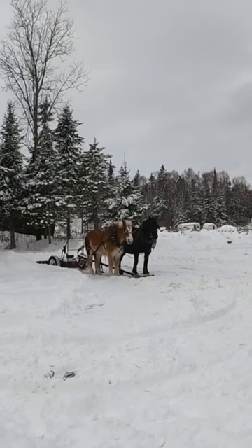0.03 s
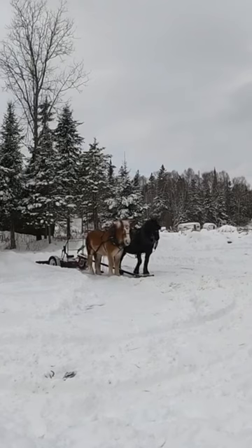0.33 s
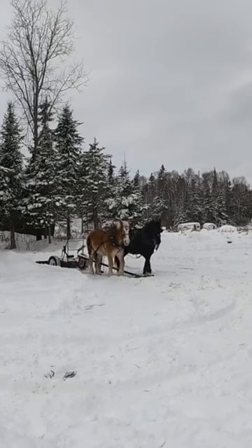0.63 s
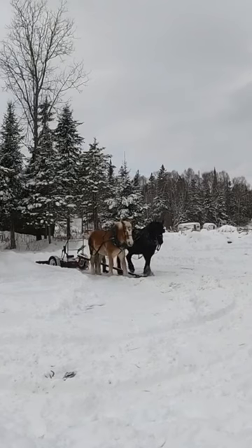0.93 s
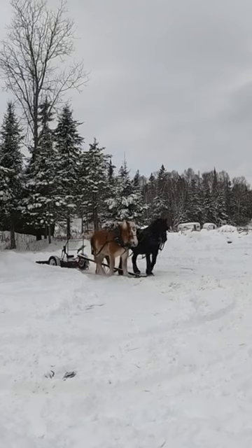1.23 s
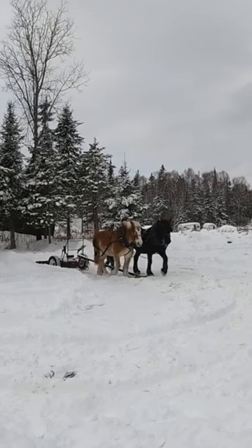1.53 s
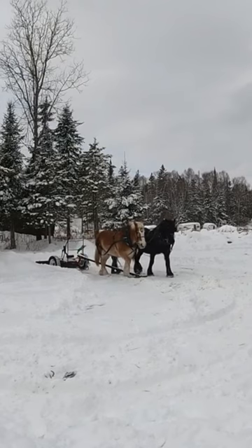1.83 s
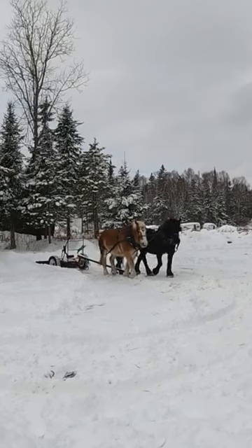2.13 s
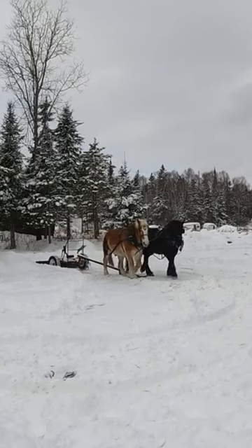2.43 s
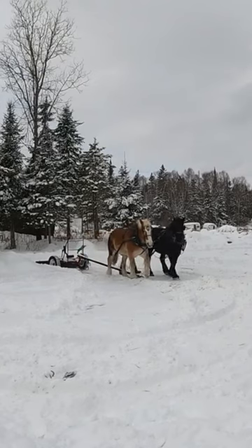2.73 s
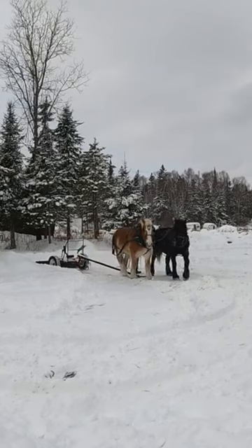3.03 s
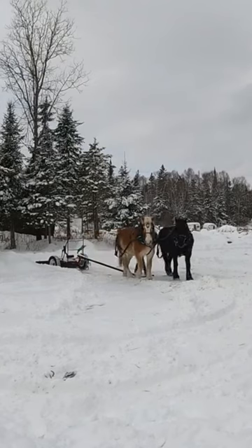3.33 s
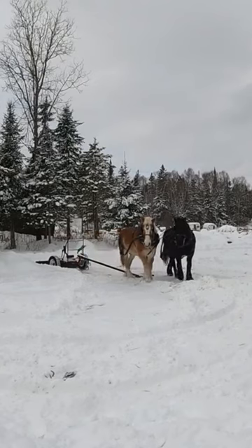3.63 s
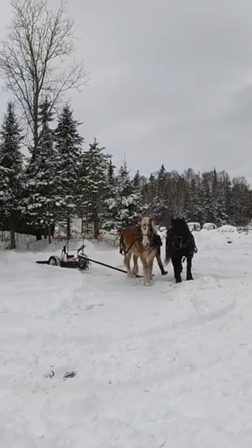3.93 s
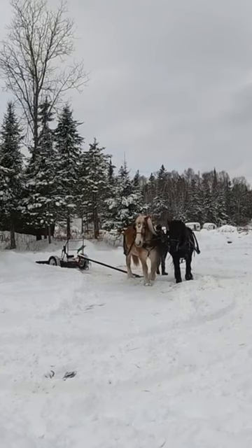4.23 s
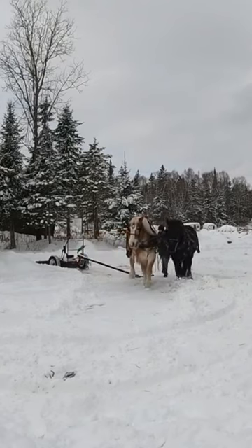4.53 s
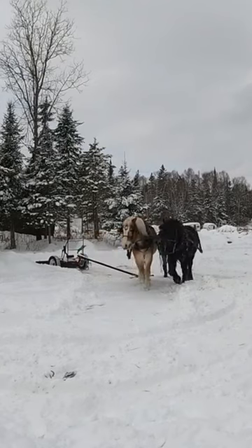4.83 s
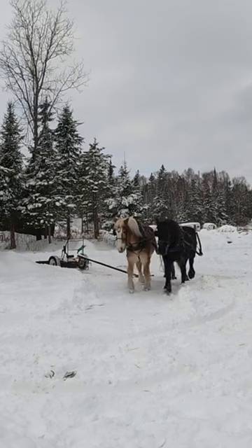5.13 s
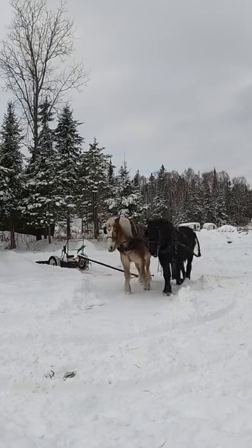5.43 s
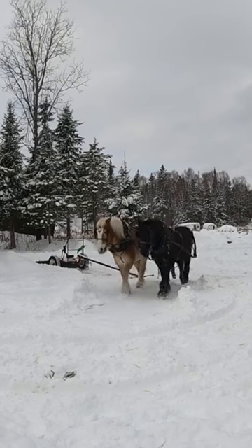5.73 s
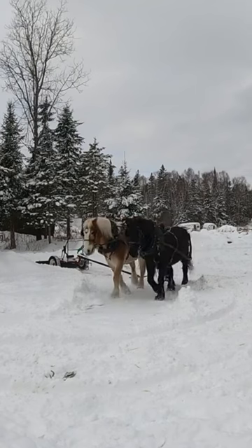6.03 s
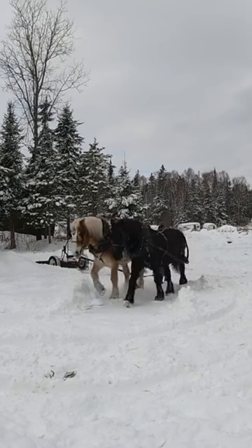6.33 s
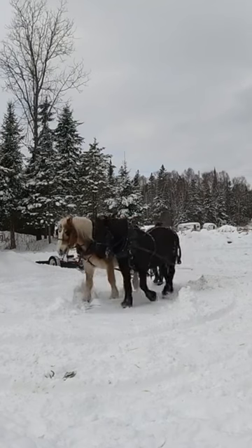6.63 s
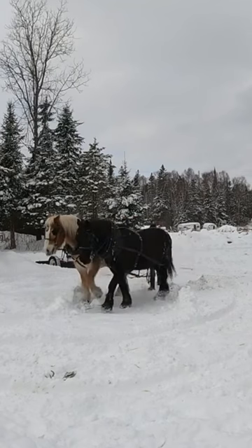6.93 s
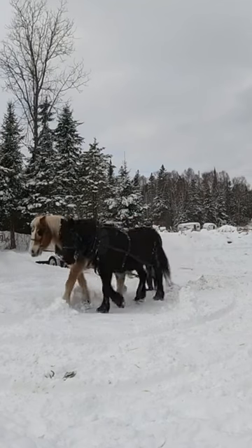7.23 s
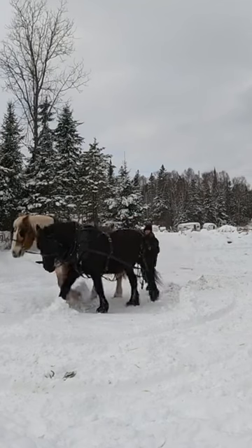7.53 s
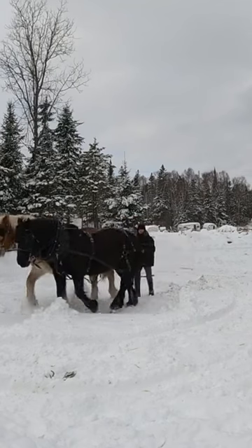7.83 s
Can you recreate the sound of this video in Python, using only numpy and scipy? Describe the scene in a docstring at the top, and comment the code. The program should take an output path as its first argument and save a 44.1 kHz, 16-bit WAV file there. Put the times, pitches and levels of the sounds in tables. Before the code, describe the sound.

Light wind rumbles on the microphone throughout, over the faint hush of an open field and a thin, far-off machine whine that fades in and out. From about 0.4 seconds two draft horses move through the snow: harness chains clink and rattle in irregular, bright bursts, and the crust crunches and creaks. A wooden pole knocks at about 1, 1.6 and 2.7 seconds, and occasionally afterwards. Dull, uneven hoof thuds begin at 1.6 seconds and grow heavier as the team approaches. From 3.7 seconds a steel ring gives a few short, high pings, the strongest just after 6 seconds and at 6.4. Low gusts swell near 3.3 and 5.3 seconds, with a brief sharp buffet at 7.4. The crunching tread peaks around 6.6 seconds and stays close, with chains jingling, until the end at 8 seconds. Everything is fairly quiet, with almost no echo.

```python
"""Light wind rumbles on the microphone and a thin far-off whine, like a machine's, fades in and out.
From 0.4 s two draft horses pull a cart across a snowy field towards the listener: harness chains
clink and rattle, snow crunches. From 1 s the wooden pole knocks, from 1.6 s hooves thud, and from
3.7 s a struck steel ring sings now and then. The tread is loudest near 6.6 s."""
import sys
import numpy as np
from scipy import signal
from scipy.io import wavfile
from scipy.ndimage import uniform_filter1d

SR = 44100
rng = np.random.default_rng(int(sys.argv[2]) if len(sys.argv) > 2 else 0)


def file_out(sig):
    """Save sig as 16-bit WAV at sys.argv[1]."""
    # one column per channel
    cols = np.atleast_2d(sig).T
    # limit, then scale
    lim = np.clip(cols, -1, 1)
    pcm = np.round(lim * 32767).astype(np.int16)
    wavfile.write(sys.argv[1], SR, pcm)


N = 355887
TIME = np.arange(N) / SR
TAIL = TIME[:SR // 6]

# Noise spectra. Each row: frequency in Hz, relative density in dB.
BREEZE_SPECTRUM = [(18, 6), (28, 2), (42, -3.5), (58, -1), (80, -17.5), (115, -18), (170, -19.5),
                   (280, -37)]
GUST_SPECTRUM = [(18, 4.5), (35, -1.5), (55, 0.5), (80, -16), (120, -23), (200, -33.5), (400, -47)]
FLAP_SPECTRUM = [(45, -16), (75, 4), (110, -7.5), (170, -10), (260, -38)]
AIR_SPECTRUM = [(60, 13.5), (200, 2), (450, 3.5), (850, 1), (1080, 10), (1400, 8.5), (1900, 1.5),
                (3000, -18.5), (7500, -18), (10000, -33.5)]
CRUST_SPECTRUM = [(1200, -6.5), (1750, 1.5), (2200, 3), (3000, -2), (4200, -3), (5400, -7), (7500, -6.5),
                  (9500, -14), (12500, -15), (15000, -37)]
PACK_SPECTRUM = [(100, 8.5), (170, 4.5), (300, 1.5), (600, -0.5), (850, -17.5), (1200, 0.5), (1700, -5.5),
                 (2600, -30)]
THUD_SPECTRUM = [(110, -4), (170, 0), (260, -3), (430, -7), (700, -14), (1200, -30)]
# Stereo image of the noises. Each row: frequency in Hz, left-right correlation.
CORRELATION = [(30, 1), (250, 0.83), (1000, 0.74), (2000, 0.48), (8000, 0.68), (12000, 1)]
# Level curves: wind between gusts, far tone, nearing tread. Each row: time in seconds, level in dB.
BREEZE_CURVE = [(0, -53), (1.5, -52), (4, -48.5), (6.1, -46.5), (8.05, -48.5)]
WHINE_CURVE = [(.06, -59), (.2, -70), (.3, -59.5), (.52, -55.5), (.72, -65), (1.35, -55.5), (1.5, -61.5),
               (1.6, -55.5), (1.92, -53.5), (1.99, -70), (2.13, -60.5), (2.42, -61), (3.1, -65.5),
               (3.17, -57), (3.3, -54), (3.4, -64.5), (3.65, -61), (4.05, -65), (4.2, -52.5), (4.38, -52.5),
               (4.44, -65), (4.75, -61), (4.85, -51), (5.15, -53.5), (5.22, -60.5), (5.52, -56),
               (5.62, -50.5), (5.96, -51), (6.03, -66), (6.15, -58.5), (6.78, -53), (7.05, -62), (7.2, -56),
               (7.4, -62.5), (7.9, -54), (7.97, -62)]
TREAD_CURVE = [(.38, -100), (.48, -81), (1.4, -74), (2.4, -74), (3.5, -70.5), (4.3, -72.5), (5.6, -68),
               (6.6, -64.5), (8.05, -66)]
# Gusts. Each row: peak time in seconds, level in dB, half-width in seconds.
WIND_GUSTS = [(0.106, -39.5, 0.055), (2.224, -42, 0.17), (3.298, -32.5, 0.069), (4.545, -46, 0.21),
              (4.73, -43.5, .03), (4.916, -47, 0.07), (5.313, -32.5, 0.069), (5.585, -41, 0.16),
              (5.895, -38, 0.077), (6.594, -45.5, 0.04), (7.373, -29.5, 0.022), (7.663, -43.5, 0.058)]
# Chain clinks. Each row: start in seconds, level in dB, tilt in dB per register, slack in seconds.
CHAIN_CLINKS = [(.433, -67.5, -5.5, 0.0024), (0.47, -64, 3.5, 0.031), (0.551, -60, 3, 0.01),
                (0.623, -64, -2.5, 0.016), (0.726, -69, -3, 0.011), (1.065, -56, 2.5, 0.011),
                (1.517, -64.5, 5, 0.0018), (1.578, -50, -2, 0.017), (1.68, -58.5, -6.5, 0.0056),
                (1.732, -49, -1.5, 0.0031), (1.892, -59.5, 3, 0.0096), (1.924, -56.5, 6, 0.019),
                (1.946, -55, -11, 0.011), (2.238, -56.5, -13, 0.011), (2.495, -61.5, -1, 0.0089),
                (2.559, -52.5, -7, 0.0095), (2.68, -51, -17, 0.015), (2.699, -47, -2, 0.0049),
                (2.725, -50.5, -9.5, 0.0096), (3.117, -59, -6, 0.0094), (3.167, -59.5, -12, 0.003),
                (3.228, -64, 0, .004), (3.243, -52, -8, 0.0058), (3.311, -53, -2, 0.0043),
                (3.377, -60, -1.5, 0.0073), (3.569, -60.5, -5.5, 0.0077), (3.606, -60, 9, 0.0096),
                (3.679, -58, 2.5, 0.017), (3.708, -57, 4, 0.0066), (3.794, -62, -2, 0.0074),
                (3.845, -44.5, -9.5, 0.0067), (4.051, -55, -5.5, 0.0028), (4.076, -56, -16, .028),
                (4.142, -61, 9, .005), (4.37, -60.5, -5.5, 0.0067), (4.514, -52, -4, 0.014),
                (4.552, -55, -4, 0.029), (4.719, -61, -2, 0.017), (4.756, -56, -3.5, 0.029),
                (4.792, -52, -1, 0.004), (4.842, -46, -16, 0.0083), (4.879, -53.5, -0.5, 0.0076),
                (5.062, -60.5, -0.5, 0.0072), (5.105, -59, -8.5, 0.0053), (5.13, -59, -14, 0.0074),
                (5.177, -55, -11, .009), (5.201, -50, -12.5, 0.0092), (5.294, -55, -14, 0.0049),
                (5.347, -54.5, -24, 0.0064), (5.38, -52.5, -10.5, 0.0063), (5.638, -58.5, 3, .007),
                (5.764, -61, 10, 0.0032), (5.856, -55, 0.5, 0.02), (5.929, -54, -3, 0.039),
                (6.083, -48, -5.5, 0.0091), (6.264, -61.5, -2, .006), (6.332, -55.5, -7, 0.008),
                (6.352, -56, -3, 0.0084), (6.401, -45, -15, 0.0066), (6.438, -56.5, -12, .004),
                (6.515, -48.5, -10, 0.0083), (6.562, -57, -17, .007), (6.6503, -51.5, 7, .004),
                (6.741, -59, -4, 0.023), (6.774, -54.5, -6.5, 0.026), (6.829, -54.5, -3, 0.0097),
                (7.149, -54.5, 1, 0.0053), (7.172, -52, -5.5, 0.0041), (7.248, -50.5, -1.5, 0.0043),
                (7.318, -48.5, -6, 0.0083), (7.576, -51.5, 2.5, 0.0054), (7.61, -54, -8, 0.02),
                (7.653, -52.5, -7, 0.0084), (7.888, -54, -20, 0.0035), (7.905, -55, 4.5, 0.0089),
                (8.022, -58.5, -8, .02)]
# Modes of chain hardware, pole and ring. Each row: frequency in Hz, level in dB, T60 in seconds.
LINK_MODES = [(1663, -1, 0.031), (1907, -1.5, 0.027), (2017, -2, 0.042), (2600, 9, 0.0066),
              (2734, 8.5, 0.014), (3445, 2.5, 0.014), (3510, -8.5, 0.066), (3830, -0.5, 0.045),
              (4570, -2, 0.048), (4880, -4, 0.042), (6080, 8, 0.017), (6380, -14, 0.06), (6944, 10, 0.038),
              (7526, 13.5, 0.049), (8270, 4, 0.091), (8750, 4.5, 0.047), (9520, -1.5, 0.047),
              (10740, -12.5, 0.031), (12300, -9, 0.045)]
POLE_MODES = [(244, -8, 0.026), (430, -8, 0.031), (570, 5, 0.017), (605, 3, 0.017), (755, -41, 0.011),
              (1196, -4, 0.052), (1322, -2, 0.032)]
RING_MODES = [(4667, -6.5, 0.94), (12830, -29, 0.3)]
# Feet dragging through the crust. Each row: peak time in seconds, level in dB.
FOOT_SCUFFS = [(.775, -67), (1.61, -67), (1.8, -68), (1.92, -62), (2.71, -60.5), (3.38, -68), (3.69, -69),
               (4.05, -63), (4.55, -60.5), (4.74, -62.5), (4.86, -63), (5.36, -61.5), (5.8, -62),
               (6.05, -58), (6.44, -58.5), (6.74, -77), (7.0, -58.5), (7.18, -60), (7.6, -60)]
# Ticks of loaded links. Each row: start in seconds, level in dB, pitch in Hz.
LINK_TICKS = [(1.518, -65, 7000), (1.754, -72, 5000), (1.812, -69.5, 9000), (1.894, -67, 10000),
              (2.656, -68, 4500), (2.697, -61, 9200), (2.713, -61, 8900), (2.747, -61, 3970),
              (3.118, -73.5, 9500), (3.847, -65, 10000), (4.542, -64, 5000), (4.598, -61, 3500),
              (4.763, -58, 4000), (4.793, -53, 11000), (5.28, -65, 5450), (5.42, -65.5, 9000),
              (5.591, -62.5, 3400), (6.404, -56.5, 6840), (6.433, -67, 7500), (6.446, -64, 7500),
              (6.621, -62.5, 6500), (6.654, -60, 8500), (6.745, -61, 6500), (6.872, -62.5, 6000),
              (7.15, -68, 10000), (7.22, -60, 3500), (7.229, -68, 5000), (7.2486, -52, 5000),
              (7.4063, -60, 7840), (7.634, -63.5, 3970), (7.692, -61, 5000), (7.868, -63, 7040)]
# Free-swinging links. Each row: start in seconds, peak in dB, pitch in Hz, T60 in seconds.
LINK_PINGS = [(.567, -50, 4300, 0.03), (0.616, -50, 4480, 0.023), (1.335, -51, 3990, 0.033),
              (1.59, -53, 1960, .1), (1.734, -41, 2600, .025), (2.232, -44, 4070, 0.025),
              (2.771, -57, 6950, 0.094), (3.118, -61, 8750, 0.099), (3.375, -62, 7400, .1),
              (3.51, -59, 8700, .07), (3.606, -60, 12000, .06), (3.705, -52, 8000, 0.061),
              (3.76, -44.5, 6460, 0.036), (4.881, -52, 7100, 0.085), (6.484, -52.5, 6400, 0.1),
              (6.871, -55, 6470, 0.099), (7.007, -48, 6840, 0.074)]
# Pole knocks. Each row: start in seconds, thud level in dB, clap level in dB, rattle in seconds.
POLE_KNOCKS = [(1.062, -48.5, -45.5, 0.014), (1.58, -60, -53.5, 0.033), (2.694, -64, -50, 0.015),
               (3.683, -76, -55, 0.017), (6.405, -57, -58, 0.021), (7.574, -56.5, -50.5, .015)]
# Hoof landings. Each row: start in seconds, level in dB.
FOOTFALLS = [(1.576, -57.5), (2.702, -53.5), (2.919, -56), (3.24, -53.5), (3.84, -54.5), (4.152, -54.5),
             (4.215, -53.5), (4.535, -56.5), (4.75, -51.5), (4.815, -51.5), (5.37, -50.5), (6.071, -46.5),
             (6.279, -53), (6.367, -46.5), (6.62, -49), (6.749, -56.5), (7.109, -45), (7.355, -48),
             (7.54, -48), (7.622, -44.5), (8.036, -47)]
# Blows on the steel ring. Each row: start in seconds, level in dB, free ringing time in seconds.
RING_STRIKES = [(3.704, -46, .01), (3.845, -48.5, .037), (4.844, -52.5, .027), (6.082, -41, .027),
                (6.399, -36, .033)]
# Register edges in Hz, low to high.
CHAIN_BANDS_HZ = [1450, 2400, 5200, 13000]
POLE_BANDS_HZ = [185, 780, 1800]


def from_db(db):
    """Decibels to gain."""
    return 10 ** (np.asarray(db) / 20)


def unit_rms(x):
    """Scale to rms 1."""
    return x / np.sqrt(np.mean(x ** 2) + 1e-20)


def unit_blow(x, span_s=.03):
    """Scale to the energy of rms 1 held for span_s."""
    return x / np.sqrt(np.sum(np.atleast_2d(x).mean(axis=0) ** 2) / (span_s * SR) + 1e-20)


def evened(x):
    """Hold rms near 1 over each 0.1 s."""
    return x / np.sqrt(uniform_filter1d(np.mean(x ** 2, axis=0), size=SR // 10))


def in_time(curve):
    """A curve at every sample."""
    return np.interp(TIME, *np.transpose(curve))


def at_hz(points, hz):
    """Interpolate on a log-frequency axis."""
    points_hz, values = np.transpose(points)
    return np.interp(np.log(hz), np.log(points_hz), values)


def band(x, low_hz, high_hz, order=2):
    """Butterworth band-pass."""
    sos = signal.butter(order, [low_hz, min(high_hz, .45 * SR)], "band", fs=SR, output="sos")
    return signal.sosfilt(sos, x)


def add(out, start_s, sound):
    """Mix a sound in at start_s."""
    i = max(round(start_s * SR), 0)
    out[:, i:i + sound.shape[-1]] += sound[..., :N - i]


def place(x, spread_db):
    """Random pan."""
    return x * from_db(rng.normal(0, spread_db) * np.array([[.5], [-.5]]))


def drift(rate_hz):
    """Slow random wander, rms 1."""
    hop, settle = 40, 2000
    r = np.exp(-2 * np.pi * rate_hz * hop / SR)
    slow = signal.lfilter([1], [1, -2 * r, r * r], rng.standard_normal(N // hop + settle + 2))[settle:]
    return np.interp(np.arange(N) / hop, np.arange(len(slow)), unit_rms(slow))


def colour(drive, spectrum, flicker_db):
    """Shape two mid-side pairs in half-octave bands, each flickering alone; stereo, rms 1."""
    out, edges_hz = 0, 2 ** np.arange(4, 14.1, .5)
    for k, (low_hz, high_hz) in enumerate(zip(edges_hz, edges_hz[1:])):
        if high_hz < spectrum[0][0] or low_hz > spectrum[-1][0]:
            continue
        hz = np.sqrt(low_hz * high_hz)
        mid, side = band(drive[k % 2], low_hz, high_hz, order=3)
        alike = at_hz(CORRELATION, hz)
        gain = from_db(at_hz(spectrum, hz) + flicker_db * drift(20))
        out = out + gain * (np.sqrt(1 + alike) * mid + np.sqrt(1 - alike) * side * [[1], [-1]])
    return unit_rms(out)


def noise(spectrum, flicker_db):
    """Coloured Gaussian stereo noise."""
    return colour(rng.standard_normal((2, 2, N)), spectrum, flicker_db)


def grains(per_s, spread_db):
    """Random clicks, many small, few large."""
    sizes = from_db(spread_db * np.minimum(rng.exponential(1, N), 4))
    return (rng.random(N) < per_s / SR) * sizes * rng.choice([-1, 1], N)


def surges(rows, rise_s, fall_s):
    """Summed power of events that build to a peak and die away."""
    power = 0
    for peak_s, db in rows:
        distance = np.maximum((peak_s - TIME) / rise_s, (TIME - peak_s) / fall_s)
        power = power + (from_db(db) * np.exp(-np.minimum(distance, 20))) ** 2
    return power


def damped(hz, db, t60_s):
    """One decaying mode."""
    return from_db(db - 60 * TAIL / t60_s) * np.sin(2 * np.pi * hz * TAIL)


def struck(modes, vary_db, detune, crack_db, crack_s, t60_scale=1):
    """One contact: a brief crack plus modes that vary from piece to piece."""
    hz, db, t60_s = np.transpose(modes)[:, :, None]
    strength, shift, phase = rng.standard_normal((3, len(modes), 1))
    swing = np.sin(2 * np.pi * (hz * (1 + detune * shift) * TAIL + phase))
    envelopes = from_db(db + vary_db * strength - 60 * TAIL / (t60_s * t60_scale))
    crack = band(rng.standard_normal(len(TAIL)), modes[0][0], 7800) * np.exp(-TAIL / crack_s)
    return unit_blow(np.sum(envelopes * swing, axis=0)) + from_db(crack_db) * unit_blow(crack)


def rattled(sound, length_s, bounce_db, count=6):
    """A first contact, then bounces at uneven gaps."""
    share = (np.arange(count) + rng.random(count)) / count
    delays = (share * min(length_s, .1) * SR).astype(int) + 1
    sizes = from_db(bounce_db) * rng.uniform(.5, 1.5, count) * (1 - share / 2)
    contacts = np.zeros(len(TAIL))
    contacts[0] = 1
    contacts[delays] = sizes * rng.choice([-1, 1], count)
    return signal.fftconvolve(contacts, sound)[:len(TAIL)]


def voiced(blow, levels_db, edges_hz):
    """The spot struck sets the level of each register; panned at random."""
    bands = zip(levels_db, edges_hz, edges_hz[1:])
    registers = [from_db(db) * unit_blow(band(blow, low, high, order=3)) for db, low, high in bands]
    return place(sum(registers), spread_db=2.5)


def wind():
    """Air rumbles at both microphone ports; gusts swell and pass, the hardest ones flap."""
    breeze = from_db(in_time(BREEZE_CURVE) + 2.14 * drift(9.7))
    breeze = breeze * evened(noise(BREEZE_SPECTRUM, flicker_db=2.5))
    gusts = sum(from_db(db) * np.exp(-np.minimum(((TIME - peak_s) / half_s) ** 2, 20))
                for peak_s, db, half_s in WIND_GUSTS)
    eddies = noise(GUST_SPECTRUM, flicker_db=1.5)
    eddies += .42 * noise(GUST_SPECTRUM, flicker_db=1.5) * [[1], [-1]]
    flapping = from_db(-39) * (gusts / gusts.max()) ** 2 * evened(noise(FLAP_SPECTRUM, flicker_db=3.5))
    return breeze + gusts * evened(eddies) + flapping


def still_air():
    """Faint hush of the open field."""
    return from_db(-63.5) * noise(AIR_SPECTRUM, flicker_db=3)


def whine(pitch_hz=1479.6, flutter_db=5.5, flutter_hz=11.6, sag_db=2):
    """A far tone swells and sinks as the air moves; the weaker it is, the more it flutters."""
    level_db = in_time(WHINE_CURVE)
    weakness = (level_db.max() - level_db) / np.ptp(level_db)
    level_db += weakness * (flutter_db * drift(flutter_hz) - sag_db)
    phase = 2 * np.pi * np.cumsum(pitch_hz + drift(2.52)) / SR
    channels = [from_db(level_db + drift(2.5)) * np.sin(phase + .35 * drift(1.2)) for _ in range(2)]
    return np.sqrt(2) * np.array(channels)


def chains(full_slack_s=.02, middle_db=3, take_up_s=.0022, take_up_db=-6.5):
    """Taut chain snaps and is damped at once; slack chain bounces and rings."""
    out = np.zeros((2, N))
    for start_s, db, tilt_db, slack_s in CHAIN_CLINKS:
        slack = np.clip(slack_s / full_slack_s, .2, 1.5)
        contact = struck(LINK_MODES, vary_db=4.5, detune=.04, crack_db=-10, crack_s=.0012,
                         t60_scale=slack ** .5)
        blow = rattled(contact, 1.5 * slack_s, bounce_db=-2 + 12.5 * np.log10(slack))
        registers_db = np.array([-tilt_db, middle_db, tilt_db])
        registers_db = registers_db - 10 * np.log10(np.sum(from_db(registers_db) ** 2))
        clink = voiced(blow, db + registers_db, CHAIN_BANDS_HZ)
        # Links touch lightly just before they snap taut.
        touch = from_db(take_up_db) * min(slack, 1) * clink
        add(out, start_s - take_up_s * rng.uniform(.5, 2.2), touch)
        add(out, start_s, clink)
    return out


def crust(crunch_db, crackles_per_s=700, crackle_db=-5):
    """The crust breaks in clumps of dry crackles over a spray of loose snow."""
    clumps = from_db(4 * drift(8))
    crackles = from_db(crackle_db) * unit_rms(grains(crackles_per_s * clumps, spread_db=3))
    drive = rng.standard_normal((2, 2, N)) + crackles * np.array([[1], [0]])  # crackles in mid only
    return from_db(crunch_db + 2.5 + .96 * drift(9)) * colour(drive, CRUST_SPECTRUM, flicker_db=2.5)


def snow_packing(tread_db, nearest_db=-60.5, under_hoof_db=-11):
    """Snow creaks as it packs under the steady tread and each footfall."""
    tread = from_db(nearest_db + 1.13 * (tread_db - tread_db.max()))
    hoof_power = from_db(under_hoof_db) ** 2 * surges(FOOTFALLS, rise_s=.033, fall_s=.13)
    slips = np.array([[grains(per_s=900, spread_db=6) for _ in range(2)] for _ in range(2)])
    return np.sqrt(tread ** 2 + hoof_power) * colour(slips, PACK_SPECTRUM, flicker_db=0)


def jingle(crunch_db, per_s=45, offset_db=-3, spread_db=13, count=30):
    """Small links touch at random, left of centre, harder when the team pulls."""
    links = [unit_blow(struck(LINK_MODES, vary_db=5, detune=.11, crack_db=-6, crack_s=.001,
                              t60_scale=.6)) for _ in range(count)]
    out = np.zeros((2, N))
    for when, size, which, left in rng.random((int(per_s * N / SR), 4)):
        gain = from_db(crunch_db[int(when * N)] + offset_db + spread_db * (size - 1))
        pan = from_db(7.1 * left * np.array([[1], [-1]]))
        add(out, when * N / SR, gain * pan * links[int(which * count)])
    return out


def tick(hz, decay_cycles=3.1, crack_db=1, crack_s=.0011):
    """A link held tight by its neighbours gives one dry tick."""
    t = TAIL[:SR // 100]
    body = np.sin(2 * np.pi * hz * t) * np.exp(-hz * t / decay_cycles)
    crack = rng.standard_normal(len(t)) * np.exp(-t / crack_s)
    contact = unit_blow(body) + from_db(crack_db) * unit_blow(crack)
    return unit_blow(band(contact, hz / 2, min(1.3 * hz, 11000), order=3))


def loaded_links(crunch_db, per_s=20, offset_db=-1.5, spread_db=11):
    """Links shift singly under load: fine ticks that follow the crunch, and a few sharp ones."""
    out = np.zeros((2, N))
    for when, softness, pitch in rng.random((int(per_s * N / SR), 3)):
        gain = from_db(crunch_db[int(when * N)] + offset_db - spread_db * softness ** .5)
        add(out, when * N / SR, place(gain * tick(3000 * 3.3 ** pitch), spread_db=3))
    for start_s, db, hz in LINK_TICKS:
        add(out, start_s, from_db(db) * tick(hz))
    return out


def free_links():
    """Links swing free and ring on as clear tones."""
    out = np.zeros((2, N))
    for start_s, db, hz, t60_s in LINK_PINGS:
        add(out, start_s, place(damped(hz, db, t60_s), spread_db=3))
    return out


def pole():
    """Wooden pole and yoke knock and judder against their irons."""
    out = np.zeros((2, N))
    for start_s, thud_db, clap_db, rattle_s in POLE_KNOCKS:
        contact = struck(POLE_MODES, vary_db=1, detune=.005, crack_db=-5, crack_s=.006)
        judder = rattled(contact, rattle_s, bounce_db=-4)
        add(out, start_s, voiced(judder, [thud_db, clap_db], POLE_BANDS_HZ))
    return out


def hooves(push_hz=120, push_rise_s=.0068, push_db=-1, thud_rise_s=.002, thud_fall_s=.016):
    """Each hoof lands with a dull thud and a low push as the ground gives."""
    push_envelope = TAIL / push_rise_s * np.exp(1 - TAIL / push_rise_s)
    push = from_db(push_db) * push_envelope * np.sin(2 * np.pi * push_hz * TAIL)
    thud_envelope = (1 - np.exp(-TAIL / thud_rise_s)) * np.exp(-TAIL / thud_fall_s)
    weight, pushes = np.zeros((2, 1, N))
    for start_s, db in FOOTFALLS:
        add(pushes, start_s, from_db(db) * push)
        add(weight, start_s, from_db(db) * thud_envelope)
    return pushes + weight * noise(THUD_SPECTRUM, flicker_db=2)


def steel_ring(rise_s=.004, catch_s=.0035, tail_db=-15):
    """A struck harness ring sings until the strap catches it; a faint tail sounds on."""
    tone = sum(damped(*mode) for mode in RING_MODES) * (1 - np.exp(-TAIL / rise_s))
    tail = from_db(tail_db) * (1 - TAIL / TAIL[-1])
    out = np.zeros((2, N))
    for start_s, db, free_s in RING_STRIKES:
        caught = np.exp(-np.maximum(TAIL - free_s, 0) / catch_s)
        add(out, start_s, place(from_db(db) * tone * (caught + tail), spread_db=6))
    return out


def field(x, wet_db=-10.5, decay_s=.022):
    """Snow swallows most reflections; horses and trees return a faint scatter."""
    scatter = band(rng.standard_normal((2, len(TAIL))), 310, 9800) * np.exp(-TAIL / decay_s)
    scatter /= np.sqrt(np.sum(scatter ** 2) / 2)
    return x + from_db(wet_db) * signal.fftconvolve(x, scatter, axes=1)[:, :N]


def scene():
    """Wind, air and whine behind the nearing team."""
    tread_db = in_time(TREAD_CURVE)
    scuff_power = surges(FOOT_SCUFFS, rise_s=.049, fall_s=.069)
    crunch_db = 10 * np.log10(from_db(tread_db) ** 2 + scuff_power)
    harness = field(chains() + jingle(crunch_db) + pole())
    harness += loaded_links(crunch_db) + free_links() + steel_ring()
    steps = crust(crunch_db) + snow_packing(tread_db) + hooves()
    return wind() + still_air() + whine() + harness + steps


def record(dry, open_s=.054, fade_s=.006, cutoff_hz=14200):
    """The microphone opens; the left port lags a fraction of a sample; the top is cut."""
    left, right = dry * np.clip((TIME - open_s) / fade_s, 0, 1)
    left = signal.lfilter([.24, 1], [1, .24], left)  # all-pass delay
    return signal.sosfilt(signal.ellip(10, .2, 70, cutoff_hz, fs=SR, output="sos"), [left, right])


dry = scene()
out = record(dry)
file_out(out)
```